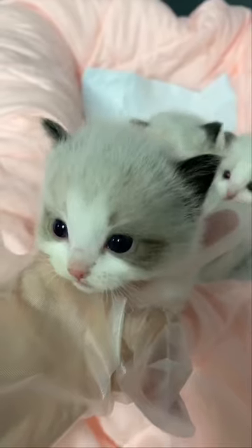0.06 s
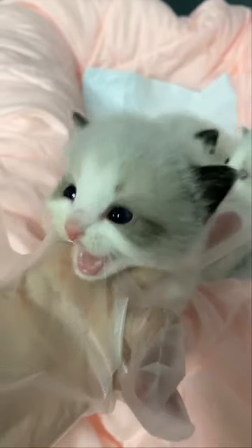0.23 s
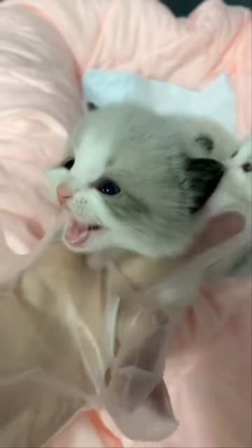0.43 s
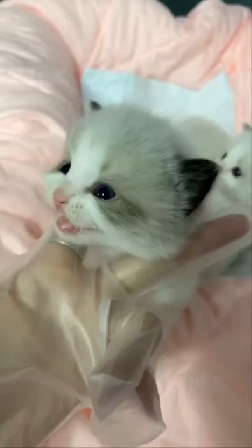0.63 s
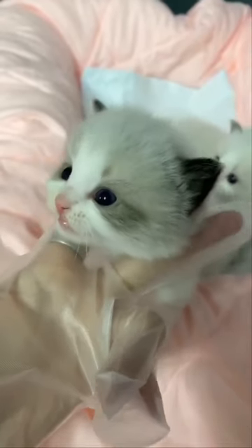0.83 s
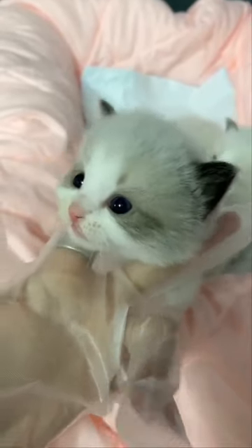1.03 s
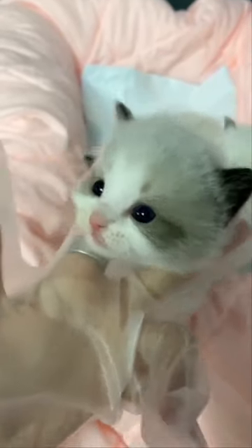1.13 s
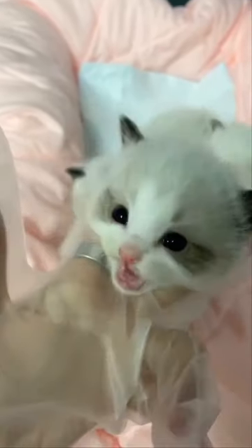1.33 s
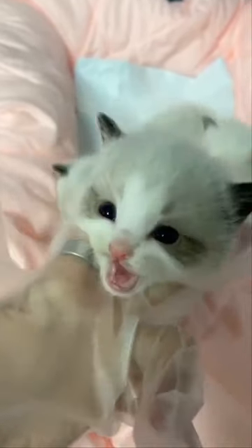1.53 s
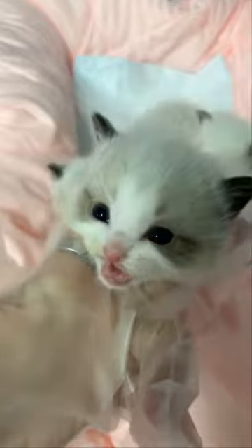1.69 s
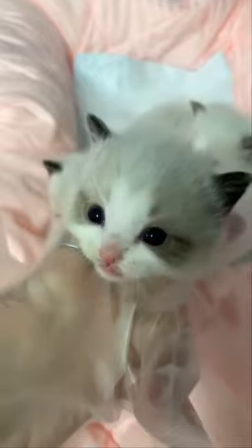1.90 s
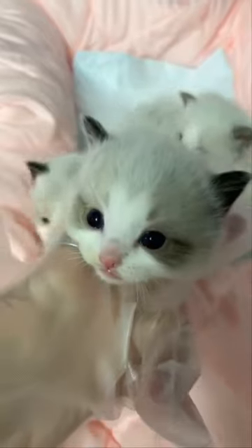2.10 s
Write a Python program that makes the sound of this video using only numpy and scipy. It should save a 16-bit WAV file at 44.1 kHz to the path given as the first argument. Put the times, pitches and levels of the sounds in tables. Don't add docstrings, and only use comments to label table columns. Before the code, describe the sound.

A young kitten gives two high, whistle-like mews very close to a phone microphone, the first louder and cracking, each sagging into a tiny croak; a fainter second kitten is heard first, over soft indoor hiss.

```python
import sys
import numpy as np
from scipy import signal
from scipy.io import wavfile
from scipy.ndimage import uniform_filter1d

SR = 44100
rng = np.random.default_rng(int(sys.argv[2]) if len(sys.argv) > 2 else 0)


def linear_from_db(decibels):
    return 10 ** (np.asarray(decibels, float) / 20)


def unload_audio(sound):
    columns = np.transpose(np.atleast_2d(sound))
    steps = np.round(np.clip(columns, -1, 1) * 32767)
    wavfile.write(sys.argv[1], SR, steps.astype(np.int16))


N = 94815
T = np.arange(N) / SR
RASP_LUMP_HZ = 110
ROUGH_HZ = 680
# (start [s], rise [s], hold [s], fall [s], level [dB])
LAST_PUFF = [
    (1.85, 0.029, 0.028, 0.048, -50.5),
]


def at_hz(points, hz):
    p = np.array(points)
    return np.interp(np.log(hz), np.log(p[:, 0]), p[:, 1])


def rms_one(x):
    return x / np.sqrt(np.mean(x ** 2) + 1e-20)


def drift(hz):
    r = np.exp(-2 * np.pi * hz / SR)
    slow = signal.lfilter([1], [1, -2 * r, r * r], rng.standard_normal(N + SR))
    return rms_one(slow[SR:])


def wobble(hz):
    sos = signal.butter(6, hz, fs=SR, output="sos")
    return rms_one(signal.sosfilt(sos, rng.standard_normal(N + SR))[SR:])


def swells(rows):
    out = 0
    for start, rise, hold, fall, db in rows:
        corners = np.cumsum([start, rise, hold, fall])
        out = out + linear_from_db(db) * np.interp(T, corners, [0, 1, 1, 0]) ** 2
    return out


def throat(x, peaks):
    out = 0
    for k, (hz, width, db) in enumerate(peaks):
        r = np.exp(-np.pi * width / SR)
        b = [(1 - r * r) / 2, 0, -(1 - r * r) / 2]
        a = [1, -2 * r * np.cos(2 * np.pi * hz / SR), r * r]
        twice = signal.lfilter(b, a, signal.lfilter(b, a, x))
        out = out + (-1) ** k * linear_from_db(db) * twice
    return out


def room_floor():
    # (pitch [Hz], level per hertz [dB])
    floor = [(100, -25.5), (200, -20), (400, -28), (700, -34), (1500, -38.5), (2500, -58), (5000, -58),
             (13000, -67.5)]
    # (time [s], level [dB])
    rumble = [(0, -52), (.1, -58.5), (1.0, -53), (1.4, -60.5), (1.95, -56), (2.15, -56.5)]
    floor_db, patch_db = -61, 2
    edges = 90 * 2 ** np.arange(0, 7.6, .5)
    white = rng.standard_normal((2, N))
    hiss = 0
    for k, (low, high) in enumerate(zip(edges, edges[1:])):
        sos = signal.butter(2, [low, high], "band", fs=SR, output="sos")
        band = signal.sosfilt(sos, white[k % 2])
        hiss = hiss + linear_from_db(at_hz(floor, np.sqrt(low * high)) + patch_db * drift(18)) * band
    sos = signal.butter(2, [30.8, 78.8], "band", fs=SR, output="sos")
    hand = rms_one(signal.sosfilt(sos, rng.standard_normal(N + SR))[SR:])
    return linear_from_db(floor_db) * rms_one(hiss) + linear_from_db(np.interp(T, *np.transpose(rumble))) * hand


def drone():
    # (pitch [Hz], width [Hz], level [dB])
    hums = [(81, 10, -69), (386, 41, -69.5)]
    out = 0
    for hz, width, db in hums:
        hum = throat(rng.standard_normal(N + SR), [(hz, width, 0)])[SR:]
        out = out + linear_from_db(db) * rms_one(hum)
    return out


def shudder():
    # (start [s], rise [s], hold [s], fall [s], level [dB])
    shakes = [
        (.45, 0.27, 0.4, 0.075, -50),
    ]
    hz, width_hz = 34, 4
    phase = 2 * np.pi * hz * T
    return swells(shakes) * (drift(width_hz) * np.sin(phase) + drift(width_hz) * np.cos(phase))


def bedroom(x):
    t = T[:SR // 2]
    t60 = .15
    tail = rng.standard_normal(len(t)) * linear_from_db(-60 * t / t60) * (t > .004)
    return signal.fftconvolve(x, tail / np.sqrt(np.sum(tail ** 2)))[:N]


def small_bends():
    # (time [s], width [s], pitch rise [share], level rise [dB])
    bell_rows = np.array([
        (0.401, 0.043, 0.013, 1.5),
        (0.631, 0.037, .006, -0.55),
        (1.816, .025, .012, -0.4),
    ])
    bells = np.exp(-((T - bell_rows[:, :1]) / bell_rows[:, 1:2]) ** 2)
    return bell_rows[:, 2] @ bells, bell_rows[:, 3] @ bells


def mew(rows, colour, third_db, scoop, slope_db, slip=0, dip_db=0, rough=0):
    # (pitch [Hz], level [dB])
    third = [(3500, -20), (4800, -17.5), (5700, -8), (6300, -9.5), (6700, -30)]
    # (time [s], pitch [Hz])
    dead_spot = [(.45, 16000), (.46, 7070), (.61, 6480), (.62, 12740), (.7, 10860), (.83, 9300),
                 (1.0, 16070), (1.3, 8300), (1.4, 8500), (1.43, 16000), (1.75, 15880), (1.79, 11800),
                 (1.88, 10300)]
    # (start [s], rise [s], hold [s], fall [s], amount [dB re 1 radian])
    uneven = [
        (.09, .04, .05, .02, -20),
        (.21, .05, .16, .06, -21),
        (1.31, .01, .14, .04, -27),
        (1.6, .04, .06, .05, -27),
    ]
    attack_s, release_s = .006, .002
    scoop_s, close_s, close_db, close_sag = .0032, .008, 6, .08
    jitter, jitter_hz = .002, 60
    shimmer_db, shimmer_hz, flicker_db = .6, 140, .45
    dead_db, dead_width_hz = 32.5, 540

    s, *cols = np.transpose(rows)
    hz, tone, mouth, edge = [uniform_filter1d(np.interp(T, s, c), size=900) for c in cols]
    since = np.maximum(T - s[0] + attack_s, 0)
    closing = np.interp(T, [s[-1] - close_s, s[-1]], [0, 1])
    gate = np.interp(T, [s[0] - attack_s, s[0], s[-1], s[-1] + release_s], [0, 1, 1, 0])
    lift, lift_db = small_bends()
    blur = swells(uneven) * (1 + 25 * slip) * wobble(ROUGH_HZ)

    bend = lift - slip - scoop * np.exp(-since / scoop_s) - close_sag * closing ** 2
    hz = hz * (1 + bend + jitter * wobble(jitter_hz))
    dip_db = dip_db + close_db * closing - lift_db
    phase = 2 * np.pi * np.cumsum(hz) / SR + rough * wobble(ROUGH_HZ)
    dead_hz = np.interp(T, *np.transpose(dead_spot))

    out = linear_from_db(tone + shimmer_db * wobble(shimmer_hz) - dip_db) * np.sin(phase)
    for k in range(2, 10):
        if k == 2:
            db = mouth
        elif k == 3:
            db = mouth + third_db + at_hz(third, k * hz)
        else:
            db = edge + at_hz(colour, k * hz) + slope_db * max(k - 6, 0)
        db = db - dead_db * np.exp(-((k * hz - dead_hz) / dead_width_hz) ** 2)
        level = linear_from_db(db + flicker_db * k * drift(shimmer_hz) - 0.9 * dip_db)
        out += level * np.sin(k * phase + (k - 1) * blur + k) * (k * hz < 16000)
    return np.sqrt(2) * gate * out


def litter_mate():
    # (time [s], pitch [Hz], tone [dB], mouth overtone [dB], edge overtones [dB])
    tail_end = [
        (0, 1850, -51, -44.5, -72),
        (.056, 1923, -50.5, -44, -74),
        (.104, 1836, -52, -48, -80),
        (.142, 1752, -50.5, -53, -68.5),
        (.19, 1684, -50.5, -68.5, -77),
        (.24, 1580, -47.5, -78.5, -76),
        (.27, 1454, -60, -67.5, -80),
    ]
    peep = [
        (.35, 1070, -63.5, -97.5, -99),
        (.368, 1220, -56, -92.5, -99),
        (.385, 1080, -67.5, -89, -99),
    ]
    # (pitch [Hz], level [dB])
    mate_edge = [(6000, 2), (7000, 6), (9500, -17.5), (13000, -4)]
    return mew(tail_end, mate_edge, -11.0, 0, -7.0) + mew(peep, mate_edge, -5.0, 0, -11.0)


def ticks():
    # (time [s], level [dB], pitch [Hz], time to fade by 60 dB [s])
    clicks = [(.001, -40.5, 3000, 0.004), (.298, -50, 6000, .006), (0.3206, -44, 6100, .01),
              (.36, -46, 6280, .008), (.383, -50, 6240, 0.0065), (.398, -47, 6280, .009),
              (.426, -41, 6116, .009), (0.509, -34, 6030, 0.0033), (.508, -42, 9600, 0.004),
              (0.838, -52.5, 5700, 0.0035), (0.845, -42, 5700, 0.0061), (.845, -30.5, 2120, 0.0054),
              (1.119, -44.5, 1460, 0.0051), (1.774, -19.5, 2827, 0.0035), (1.775, -20, 5100, 0.0019),
              (2.107, -61.5, 1490, .005), (2.107, -63, 5200, 0.0043)]
    rise_s = .0004
    out = np.zeros(N)
    for start, db, hz, t60 in clicks:
        t = np.maximum(T - start, 0)
        out += linear_from_db(db - 60 * t / t60) * (1 - np.exp(-t / rise_s)) ** 2 * np.sin(2 * np.pi * hz * t)
    return out


def croaks():
    # (time [s], pitch [Hz], length [s], level [dB])
    slack = [
        (0.8448, 938, 0.0077, -41.5),
        (1.8876, 877, 0.011, -38.5),
    ]
    sag, overtone = .16, .4
    out = np.zeros(N)
    for s, hz, length, db in slack:
        u = np.clip((T - s) / length, 0, 1)
        phase = 2 * np.pi * hz * length * (u - sag * u * u)
        shape = 2 * np.sin(np.pi * u ** 0.65) * (u < 1)
        out += linear_from_db(db) * shape * (np.sin(phase) + overtone * np.sin(2 * phase))
    return out


def puffs():
    # (start [s], rise [s], hold [s], fall [s], level [dB])
    breaths = [
        (.846, 0.0046, 0.017, 0.041, -57),
        (1.0, 0.011, 0.04, 0.035, -72),
        (1.17, .1, 0.047, 0.0057, -70.5),
    ]
    # (pitch [Hz], width [Hz], level [dB])
    open_throat = [(1357, 2040, 1), (2600, 480, -9), (5100, 1100, 2), (9000, 920, -19), (11500, 2100, -6.5)]
    closing_throat = [(1440, 620, 4), (2560, 1100, -4), (4880, 850, 4), (9100, 1000, -20.5),
                      (11400, 1000, -20.5)]
    air = rng.standard_normal(N)
    early = swells(breaths) * rms_one(throat(air, open_throat))
    return early + swells(LAST_PUFF) * rms_one(throat(air, closing_throat))


def pocket(rows, width_hz):
    s, hz, db = np.transpose(rows)
    phase = 2 * np.pi * np.cumsum(np.interp(T, s, hz)) / SR
    hiss = wobble(width_hz) * np.sin(phase) + wobble(width_hz) * np.cos(phase)
    level = linear_from_db(np.interp(T, s, db) + 3.5 * wobble(RASP_LUMP_HZ))
    return (T > s[0]) * (T < s[-1]) * level * hiss


def mouth_pockets():
    # (time [s], pitch [Hz], level [dB])
    first = [(.2, 3060, -72), (.24, 2910, -53), (.29, 2725, -46), (.33, 2610, -44.5), (.39, 2480, -44.5),
             (.43, 2365, -77)]
    second_low = [(1.4, 2880, -78), (1.42, 2880, -55.5), (1.47, 2950, -64), (1.5, 2900, -70.5),
                  (1.54, 2800, -58.5), (1.6, 2960, -84.5)]
    second_middle = [(1.45, 5300, -87), (1.47, 5300, -81), (1.54, 5300, -69.5), (1.59, 5350, -91),
                     (1.65, 5400, -79), (1.74, 5000, -81.5)]
    second_high = [(1.44, 10900, -87), (1.465, 10900, -67), (1.485, 10950, -64), (1.52, 10900, -76)]
    low = pocket(first, 200) + pocket(second_low, 140)
    return low + pocket(second_middle, 170) + pocket(second_high, 170)


def rasp(rows, peaks, slip):
    crackles_per_s, crackle_db, lump_db, break_hiss_db = 600, 7, 2, -30
    crackle = signal.lfilter([1], [1, -.96], rng.random(N) < crackles_per_s / SR)
    air = rng.standard_normal(N) * linear_from_db(lump_db * wobble(RASP_LUMP_HZ))
    air = air * (1 + linear_from_db(crackle_db) * crackle)
    hollow = signal.butter(2, [3050, 3750], "bandstop", fs=SR, output="sos")
    air = signal.sosfilt(hollow, air)
    return (swells(rows) + linear_from_db(break_hiss_db) * slip) * rms_one(throat(air, peaks))


def breaks():
    # (time [s], pitch drop [share], level dip [dB], onset [s], recovery [s])
    slips = [(.284, .02, 1, .002, .003), (.3, .02, 0, .001, .003), (.3205, .09, 3.5, .0003, .004),
             (.326, .035, 2.5, .003, .003), (.341, .018, 1, .003, .004), (.36, .055, 3.5, .004, .0015),
             (.377, .04, 4, .0015, .0012), (.3835, .06, 5, .0015, .0015), (.399, .08, 5, .0015, .003),
             (.408, .015, 1.5, .002, .002), (.4275, .07, 6, .003, .002), (.438, .02, 2, .002, .004),
             (.455, .005, 2.5, .006, .006), (1.416, .015, 1.5, .002, .005), (1.841, .02, .5, .003, .004),
             (1.852, .1, 1.5, .0015, .003), (1.852, 0, 2.5, .001, .04), (1.8565, .07, 1.5, .002, .001),
             (1.871, .025, 1, .002, .001), (1.879, .04, 1.5, .002, .002)]
    shapes = [np.exp(-np.abs(T - s) / np.where(T < s, onset, heal)) for s, _, _, onset, heal in slips]
    smooth = uniform_filter1d(np.array(shapes), size=40, axis=1)
    rows = np.array(slips)
    return rows[:, 1] @ smooth, rows[:, 2] @ smooth


def near_kitten():
    # (time [s], pitch [Hz], tone [dB], mouth overtone [dB], edge overtones [dB])
    mew_1 = [
        (.192, 1642, -41, -50.5, -77),
        (.225, 1882, -30.5, -39, -73),
        (.265, 2132, -27, -41, -65),
        (.315, 2257, -21, -40, -56),
        (.51, 2114, -19, -53.5, -60.5),
        (.69, 1821, -34.5, -62, -58.5),
        (.78, 1648, -35, -64, -64),
        (.83, 1414, -30, -55.5, -69),
        (.845, 1288, -30, -52.5, -54),
    ]
    mew_2 = [
        (1.321, 1569, -34, -34.5, -59),
        (1.372, 1907, -33, -39, -61.5),
        (1.41, 2046, -31, -37.5, -53.5),
        (1.445, 2094, -30.5, -41, -59),
        (1.5, 2057, -30, -42.5, -55.5),
        (1.6, 2044, -29, -45.5, -54.5),
        (1.77, 1770, -29, -57, -66.5),
        (1.845, 1457, -25, -52.5, -62.5),
        (1.886, 1177, -29.5, -42, -66.5),
    ]
    # (pitch [Hz], level [dB])
    edge_1 = [(4500, -11), (6200, -25.5), (8500, 2.5), (10300, 6.5), (11500, 1), (12500, -3), (14000, -7)]
    edge_2 = [(4500, 3), (6200, 0.5), (8500, -14), (10300, 0.5), (11500, -2), (12500, -8), (14000, -4)]
    # (start [s], rise [s], hold [s], fall [s], level [dB])
    rasps_1 = [
        (.12, 0.091, 0.0079, 0.012, -61),
        (.2, 0.033, 0.058, 0.072, -48),
        (.3, 0.036, .09, 0.037, -57.5),
        (.49, 0.011, 0.03, 0.033, -65),
        (.79, .03, 0.016, .01, -70),
    ]
    rasps_2 = [
        (1.312, 0.0073, 0.01, 0.04, -62),
        (1.33, .03, .05, .05, -67),
        (1.4, .02, 0.025, 0.031, -58),
        (1.61, 0.046, 0.04, .05, -74),
        (1.8, .03, .02, .02, -76),
    ]
    # (pitch [Hz], width [Hz], level [dB])
    throat_1 = [(1860, 340, 10), (4500, 1600, -3.5), (5700, 1280, -4.5), (9300, 890, -25.5),
                (11310, 450, -0.5)]
    throat_2 = [(1670, 400, 3.5), (3900, 700, -11.5), (5400, 330, 1), (9600, 1000, -20),
                (10900, 1100, -8.5), (12300, 900, -9.5)]

    slip, dip_db = breaks()
    rough = linear_from_db(12) * swells(rasps_1 + rasps_2) + linear_from_db(31) * swells(LAST_PUFF)
    voice = mew(mew_1, edge_1, -1.2, 0.23, -8.5, slip, dip_db, rough)
    voice = voice + mew(mew_2, edge_2, 0.8, 0.059, -6.5, slip, dip_db, rough)
    air = rasp(rasps_1, throat_1, slip * (T < 1))
    air = air + rasp(rasps_2, throat_2, 0.25 * slip * (T > 1))
    return voice + air


def scene():
    cats = litter_mate() + ticks() + croaks() + puffs() + mouth_pockets() + near_kitten()
    echo = linear_from_db(-34) * bedroom(cats)
    return (cats + echo + room_floor() + shudder() + drone())[None, :]


def band_limit(x):
    return signal.sosfilt(signal.butter(12, 14250, fs=SR, output="sos"), x)


def record(dry):
    notch = signal.butter(4, [6820, 8360], "bandstop", fs=SR, output="sos")
    top_cut = signal.cheby2(12, 60, 14800, fs=SR, output="sos")
    x = signal.sosfilt(notch, dry)
    x = signal.sosfilt(top_cut, x)
    return band_limit(x)


dry = scene()
out = record(dry)
unload_audio(out)
```